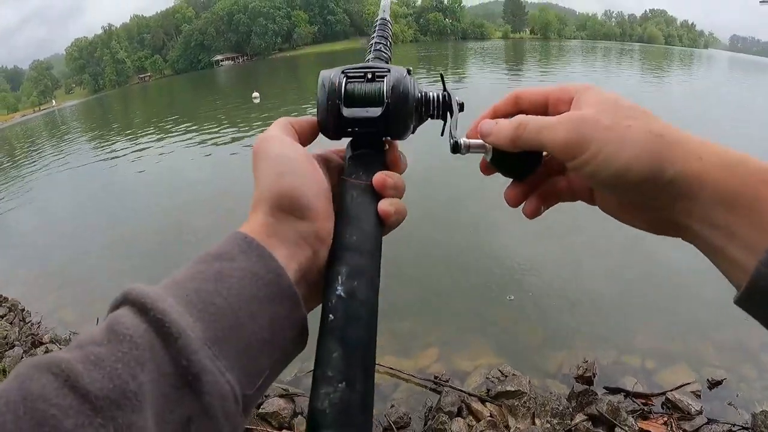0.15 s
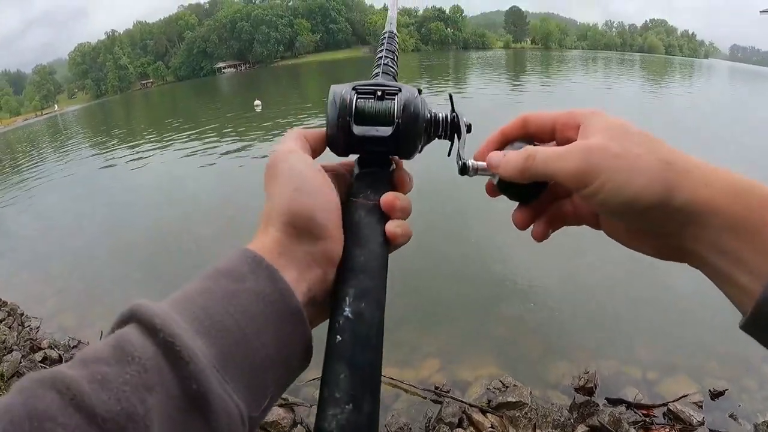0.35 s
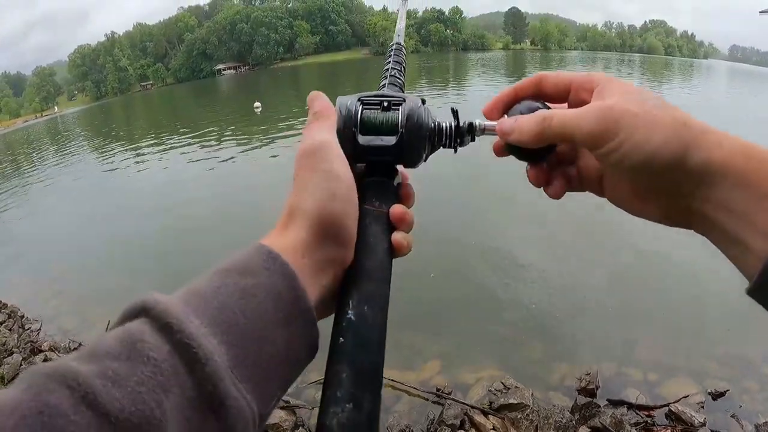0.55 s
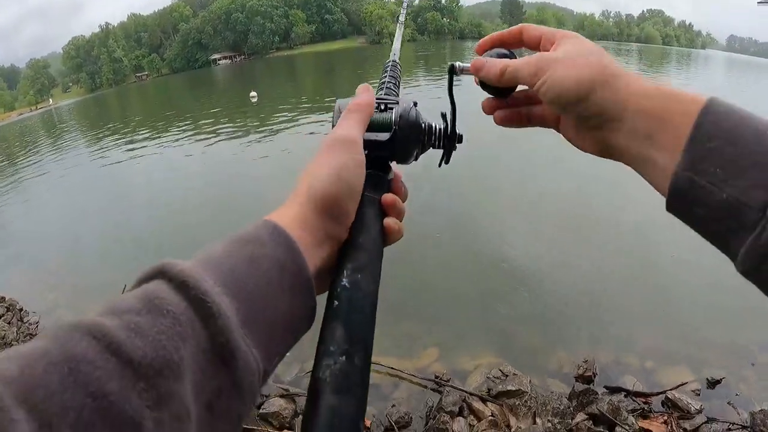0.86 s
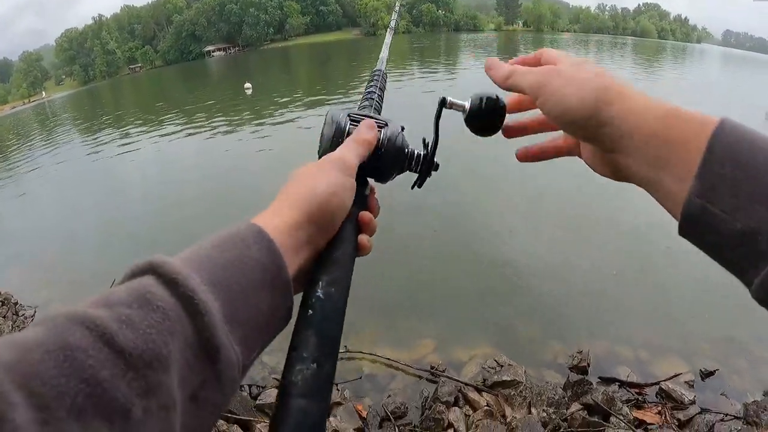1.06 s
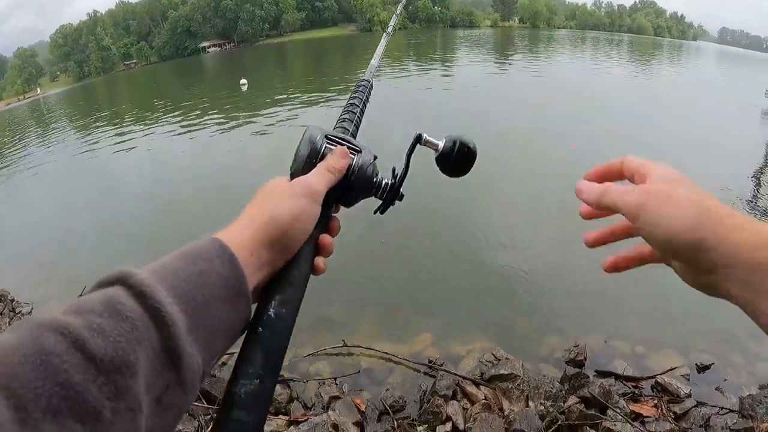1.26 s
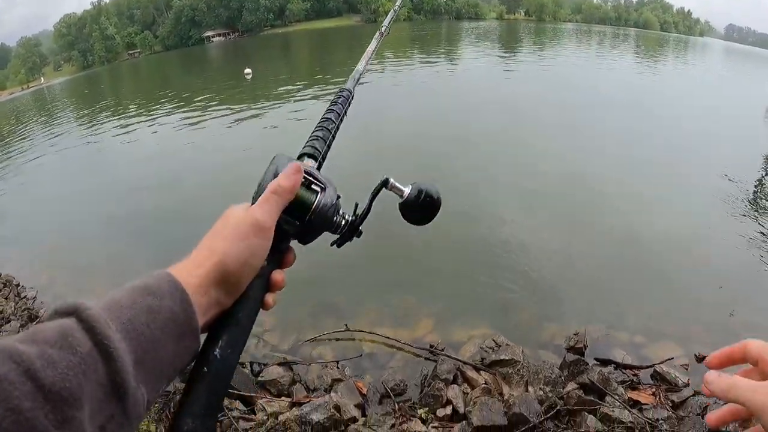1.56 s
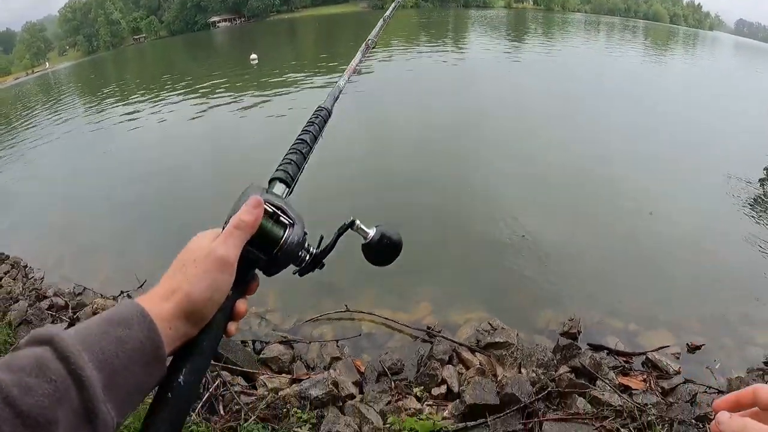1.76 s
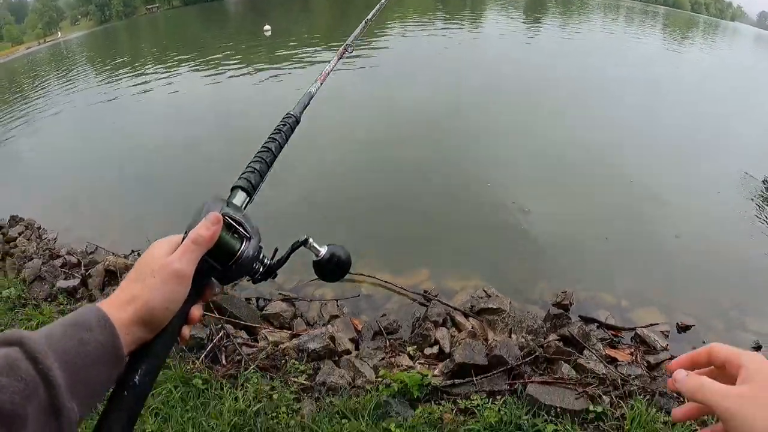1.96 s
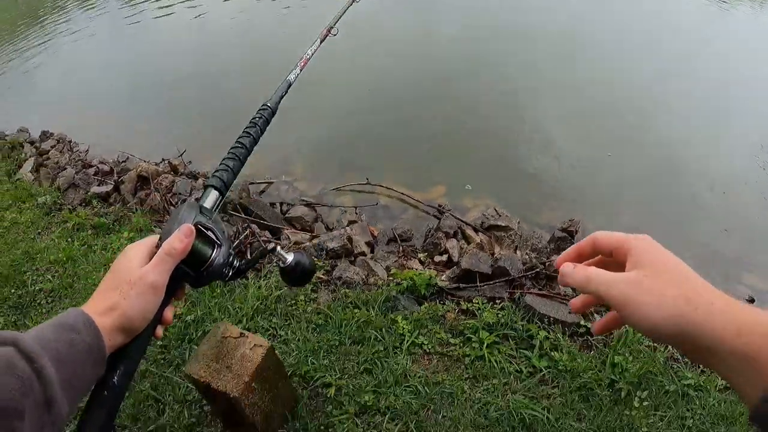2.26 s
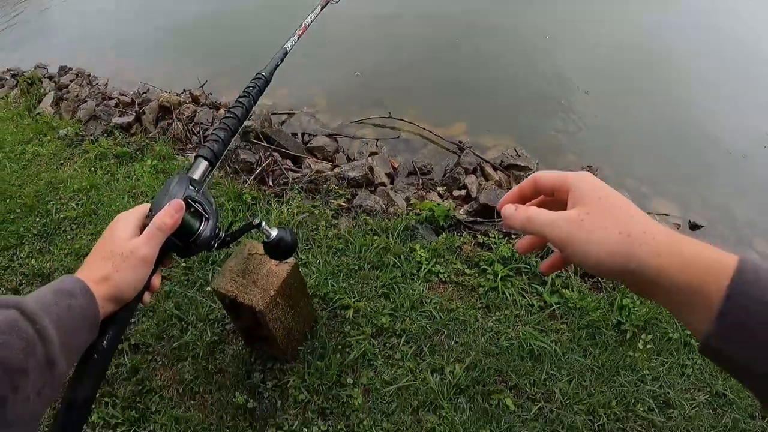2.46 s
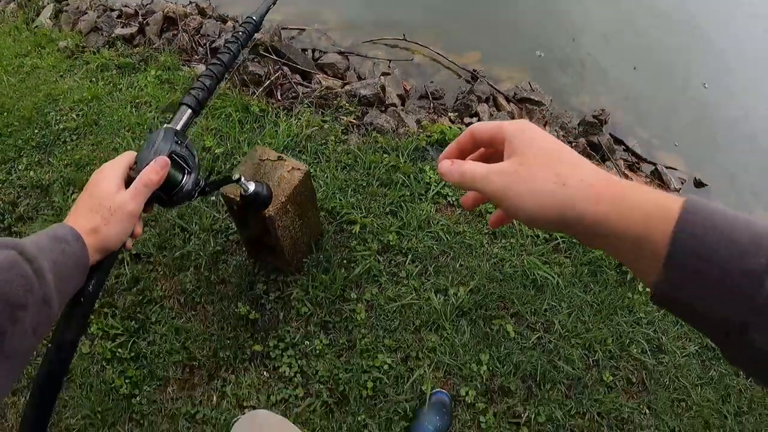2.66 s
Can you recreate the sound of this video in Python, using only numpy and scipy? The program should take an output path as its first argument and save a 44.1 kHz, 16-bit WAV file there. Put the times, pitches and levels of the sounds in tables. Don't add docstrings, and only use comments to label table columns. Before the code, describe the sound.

Fishing reel clicker snaps by hand, knocks, then ratchets into a fast run beside a rumbling shore

```python
import sys
import numpy as np
from scipy import signal
from scipy.fft import rfft, irfft, next_fast_len
from scipy.io import wavfile
from scipy.ndimage import uniform_filter1d

SR = 44100
rng = np.random.default_rng(int(sys.argv[2]) if len(sys.argv) > 2 else 0)


def pcm_store(signal):
    levels = np.round(np.clip(np.atleast_2d(signal), -1, 1) * 32767)
    wavfile.write(sys.argv[1], SR, levels.astype(np.int16).T)


def makeup_ratio(level_db):
    decades = np.asarray(level_db, float) / 20
    return 10 ** decades


N = 123479

# frequency in Hz, level in dB per Hz.
SHORE_SPECTRUM = [(15, -26), (45, -0.5), (100, 2), (165, -6.5), (330, -17), (1400, -28), (2900, -37),
                  (7000, -40.5), (12500, -57)]
# frequency in Hz, level in dB.
SHORE_SIDE = [(60, -26.5), (200, -13), (500, -7), (1500, -2.5), (8000, -7.5)]
# time in seconds, level in dB.
SHORE_FADE = [
    (0, 1.5),
    (.15, 1.5),
    (1.4, 2.5),
    (2.2, 0),
    (2.8, 2),
]
SHORE_DB, SHORE_TOP_HZ = -46, 12800
SWELL_DB, FLICKER_DB = .6, 1.5

# frequency in Hz, width in Hz, level in dB.
DRONE_LINES = [
    (61.9, 8.5, -57.5),
    (140.96, 8.2, -55),
]

# start in seconds, level in dB, centre in Hz, length in seconds.
FINGER_TICKS = [(0.02, -56, 9000, 0.0037), (0.162, -69, 5000, .006), (0.203, -64, 5700, .005),
                (.2194, -55, 6100, 0.007), (0.2595, -49, 3100, 0.0095), (0.402, -62, 7000, .006),
                (0.4756, -44.5, 5730, 0.0028), (0.478, -64, 6100, 0.04), (1.093, -44, 5000, .004),
                (1.135, -48.5, 5360, 0.0032), (1.174, -54, 4140, 0.0049), (1.228, -37, 3500, 0.0062),
                (1.439, -45, 3000, 0.005), (1.461, -38, 3000, 0.01), (.27, -48, 1470, 0.089)]

# time in seconds, level in dB.
WOUND_SNAPS = [(0.3336, -18), (0.6016, -17.5), (0.6229, -18), (0.6399, -17), (0.658, -16.5),
               (0.6764, -15.5), (0.6965, -15.5), (0.7158, -16.5), (0.7341, -16), (0.7515, -16),
               (0.768, -16), (0.784, -15), (0.8004, -16), (0.818, -16), (0.8361, -16.5), (0.8543, -17),
               (0.8722, -16), (0.8878, -17.5), (0.9027, -15), (0.9196, -15.5), (0.9368, -16),
               (0.9553, -15.5), (0.9793, -15.5), (1.0152, -16)]
# time in seconds, level in
# dB.
DRAGGED_SNAPS = [(1.4858, -16), (1.537, -17.5), (1.565, -17), (1.5885, -17), (1.6122, -19.5), (1.6352, -18),
                 (1.6606, -18), (1.6885, -17), (1.714, -16.5), (1.7356, -17), (1.7538, -16), (1.774, -17),
                 (1.801, -18), (1.836, -17), (1.8639, -17), (1.8888, -17), (1.913, -17), (1.9384, -19),
                 (1.965, -19.5), (1.9891, -18.5), (2.01, -16.5), (2.0275, -16.5), (2.0438, -16.5),
                 (2.0591, -17.5), (2.0745, -16.5), (2.0904, -17), (2.1055, -16.5), (2.1193, -19), (2.1321, -17),
             (2.1443, -19), (2.1554, -20), (2.1663, -20.0), (2.1771, -19.5), (2.1869, -17.5), (2.1977, -18),
             (2.208, -18.5), (2.2176, -19), (2.2287, -17.5), (2.2394, -16.5), (2.2499, -18.5),
             (2.2609, -19.5), (2.2715, -19.0), (2.2818, -19), (2.2926, -20.5), (2.3028, -20.5),
             (2.313, -20.0), (2.3234, -18), (2.3341, -19.0), (2.3446, -17), (2.3552, -20), (2.3671, -17),
             (2.379, -17.5), (2.3915, -17.5), (2.4046, -19.0), (2.4177, -18.0), (2.4311, -20.5),
             (2.4439, -20.0), (2.4568, -20), (2.4705, -21), (2.4829, -18.5), (2.4964, -19.5), (2.5112, -17),
             (2.5274, -19), (2.5446, -17), (2.5629, -18), (2.5803, -19), (2.5979, -18.0), (2.616, -20.5),
             (2.6352, -20.5), (2.6548, -22), (2.675, -22), (2.6959, -20.5), (2.7182, -20), (2.7416, -19.5),
             (2.7651, -18.5), (2.787, -19.5)]
SNAP_DB = 0.5
DRAG_START_S = 1.4
WHEEL_TEETH, LOW_TOOTH = 13, 1
# delay in seconds, level in dB.
REBOUNDS = [
    (.00089, -5.5),
    (.0018, -15),
    (.0035, -20.5),
]
REBOUND_SPREAD, SNAP_COLOUR_DB = .06, .8

# frequency in Hz, time to fall 60 dB in seconds, level of the longer ring in dB.
ROD_MODE = (515.5, 0.1, -65)
# frequency in Hz, time to fall 60 dB in seconds, level of the longer ring in dB.
BODY_MODES = [(1059.6, 0.0072, -7), (1405, 0.0089, -5), (1690, 0.024, -7), (2440, 0.0053, -22.5),
              (3000, 0.0089, -10.5), (3500, 0.0032, -7), (3832, 0.0035, -2.5), (4655, 0.0031, -8),
              (5190, 0.0039, -3), (5760, 0.0062, -16.5), (7775, 0.0065, -17), (8940, 0.0073, -15),
              (12000, 0.0043, -16), (14600, 0.0046, -26)]
TWIN_DETUNE, RING_LONGER, BODY_LOW_HZ = 1, 3.36, 850
# time in seconds, for upright, tilted, turning, lowered, low.
POSE_S = [.62, .95, 1.55, 2.1, 2.75]
# level in dB upright, tilted, turning, lowered, low.
POSE_DB = [(-25, -24.5, -29, -29.5, -30.5), (-10.5, -11.0, -18.5, -24.5, -34), (-24, -13, -11, -33, -50),
           (-14, -9.5, -19, -22.5, -16), (-19, -35, -9.0, -11, -2), (-16, -14, -6, -8.5, -4),
           (-3, -1, -2, -27, -32), (-3, 1, -10, -7, -3.5), (4, 1.5, 3.0, 4, 2), (-2, -10.5, -9.5, -1, -4),
           (-0.5, -3, -8.5, -1.5, 6.5), (-3, -12, -1.5, -4.5, -4), (-3.5, -6, -4.5, -5.5, -3.0),
           (-8, -8.5, -7, -15, -8), (-26, -21.0, -26, -20, -19)]
# time in seconds, for upright, turning, low.
PAN_S = [1.0, 1.8, 2.7]
# difference in dB upright, turning, low.
PAN_DB = [(3, 5, 6.8), (-5, -4, 0.5), (6, 2.5, 2.0), (-5.5, -10, 0.89), (1, 3, 1.3), (0, 2.5, 0.79),
          (1, 0, 2.7), (2, 8, 4.4), (1.0, 4.0, 4.1), (1, -4.5, 2.2), (-1.5, 1.0, 3.3), (1.5, 3, 1.9),
          (-1, 4, 5.1), (-2.5, -0.5, 1.9), (-6, -6, 1.5)]
# cosine part in dB, sine part in dB.
TURN_DB = [(0, 3), (-3.5, -0.5), (-1, 1), (-3, -2.5), (4.5, -2), (3.5, -3), (-6.5, 2), (5.5, 0), (0.5, -1),
           (3, -2.0), (3, 0.5), (0.5, 0.5), (0.5, 2.5), (0, 1.5), (0.5, 4)]
LEFT_LATE_S, EAR_LAG_S = .00002, .000015

RATTLE_DB, RATTLE_T60_S, RATTLE_HZ = -8.5, 0.036, 2600
AIR_DB, AIR_T60_S, AIR_HZ, AIR_OCTAVES = -19.5, 0.06, 1800, 2.42
RATTLE_WIDTH, TAIL_TOP_HZ = .3, 7500

# level in dB, length of contact in seconds, length of rattle in seconds.
CLUTCH_SCRAPE = (-28, .00006, .0022)
CLUTCH_KNOCK = (-21.5, .00009, .00012)
HANDLE_KNOCK = (-22, 0.00012, 0.001187)
SCRAPE_S, CLUTCH_S, HANDLE_S = 1.2348, 1.24, 1.3477
# frequency in Hz, level in dB, time to fall 60 dB in seconds.
SCRAPE_MODES = [(3500, 1, 0.0021), (6340, 5, 0.0041), (11200, 7, 0.0022)]
# frequency in Hz, level in dB, time to fall 60 dB in seconds.
CLUTCH_MODES = [(520, -25, 0.07), (680, -30, 0.05), (1610, -13, 0.01), (2270, -8, 0.016), (3420, 6, 0.005),
                (4930, 0, 0.004), (5730, -9, 0.014), (7640, 7, 0.004), (11700, 7, .003), (14300, -4, .003)]
# frequency in Hz, level in dB, time to fall 60 dB in seconds.
HANDLE_MODES = [(312, -8.5, 0.019), (593, -3, 0.03), (903, -2.5, 0.021), (1400, -2.5, 0.014),
                (1860, -27, 0.011), (3120, -3.5, 0.0065), (4650, -8, 0.0083), (7000, 4, 0.003),
                (12200, 4, .004)]


def ring(x, hz, t60):
    radius = np.exp(-np.log(1000) / (t60 * SR))
    w = 2 * np.pi * min(hz, .45 * SR) / SR
    return signal.lfilter([0, np.sin(w)], [1, -2 * radius * np.cos(w), radius * radius], x)


def band(x, hz, octaves):
    edges = [hz * 2 ** (-octaves / 2), min(hz * 2 ** (octaves / 2), .48 * SR)]
    return signal.sosfilt(signal.butter(2, edges, "band", fs=SR, output="sos"), x)


def dull(x, hz):
    return signal.sosfilt(signal.butter(6, hz, fs=SR, output="sos"), x)


def spikes(times, sizes):
    at = np.asarray(times) * SR
    taps = np.floor(at)[:, None] + np.arange(-7, 9)
    distance = taps - at[:, None]
    shape = np.sinc(distance) * np.cos(np.pi * distance / 16) ** 2
    places = taps.clip(0, N - 1).astype(int)
    return np.bincount(places.ravel(), (shape * np.asarray(sizes)[:, None]).ravel(), N)


def fading(times, sizes, t60):
    decay = np.exp(-np.log(1000) / (t60 * SR))
    return signal.lfilter([1], [1, -decay], abs(spikes(times, sizes)))


def walk(rate):
    hold = int(SR / rate)
    steps = np.repeat(rng.standard_normal(N // hold + 1), hold)
    return 1.3 * uniform_filter1d(uniform_filter1d(steps, hold), hold)[:N]


def wide_noise(width):
    return rng.standard_normal(N) + width * rng.standard_normal((2, N))


def shore():
    swell = walk(1.24)
    f = np.fft.rfftfreq(next_fast_len(N + 1, True), 1 / SR) + 1

    def colour(table):
        hz, db = np.array(table).T
        return makeup_ratio(np.interp(np.log(f), np.log(hz), db))

    mid, side = rfft(rng.standard_normal((2, 2 * len(f) - 2))) * colour(SHORE_SPECTRUM)
    pair = mid + side * colour(SHORE_SIDE) * np.array([[1], [-1]])
    out = 0
    for octave in np.arange(3.5, 15, .5):
        share = np.cos(np.pi * np.clip(np.log2(f) - octave, -.5, .5)) ** 2
        out = out + irfft(pair * share)[:, :N] * makeup_ratio(FLICKER_DB * walk(8.93))
    fade = np.interp(np.arange(N) / SR, *np.array(SHORE_FADE).T)
    out = out * makeup_ratio(SWELL_DB * swell + fade)
    return dull(out, SHORE_TOP_HZ) * makeup_ratio(SHORE_DB) / np.std(out)


def drone():
    out = 0
    for hz, width, db in DRONE_LINES:
        line = band(rng.standard_normal(N), hz, width / hz * 1.4)
        out = out + makeup_ratio(db) * line * np.sqrt(SR / width / 2)
    return out


def fingers():
    noise = wide_noise(0.58)
    out = 0
    for s, db, hz, length in FINGER_TICKS:
        puff = fading([s], [makeup_ratio(db)], 4 * length) * noise
        out = out + band(band(puff, hz, 1.4), hz, 1.4)
    return out


def clicker():
    t, db = np.array(WOUND_SNAPS + DRAGGED_SNAPS).T
    db = db + SNAP_DB
    modes = [ROD_MODE] + BODY_MODES
    angle = 2 * np.pi * (np.arange(len(t)) - LOW_TOOTH) / WHEEL_TEETH
    turn = np.array([np.cos(angle), np.sin(angle)])
    chance = rng.standard_normal((len(t), len(modes), 2))
    lag = rng.standard_normal(len(modes))

    delay, rebound_db = np.array([(0, 0.089)] + REBOUNDS).T
    stretch = np.exp(REBOUND_SPREAD * (turn[1] + chance[:, 0, 0] / 2))
    hits = t[:, None] + delay * stretch[:, None]

    rod, body = np.zeros((2, 2, N))
    for k, (hz, t60, ring_db) in enumerate(modes):
        turn_db = (t > DRAG_START_S) * (np.array(TURN_DB[k]) @ turn)
        mode_db = db + np.interp(t, POSE_S, POSE_DB[k]) + turn_db
        pan_db = np.interp(t, PAN_S, PAN_DB[k])
        for c, side in enumerate((.5, -.5)):
            size = makeup_ratio((mode_db + side * pan_db)[:, None] + rebound_db)
            times = hits.ravel() + side * (EAR_LAG_S * lag[k] + LEFT_LATE_S)
            low_hit, high_hit = [spikes(times, (size * makeup_ratio(SNAP_COLOUR_DB * chance[:, k, [j]])).ravel())
                                 for j in range(2)]
            short = ring(low_hit, hz - TWIN_DETUNE / t60, t60) + ring(high_hit, hz + TWIN_DETUNE / t60, t60)
            longer = makeup_ratio(ring_db) * ring(high_hit, hz, RING_LONGER * t60)
            target = body if k else rod
            target[c] += (-1) ** k * (short / 2 + longer)

    noise = wide_noise(RATTLE_WIDTH)
    rattle = fading(t, makeup_ratio(db + RATTLE_DB - 2.5), RATTLE_T60_S) * noise
    body += dull(band(rattle, RATTLE_HZ, 2.57), TAIL_TOP_HZ)
    body = signal.sosfilt(signal.butter(4, BODY_LOW_HZ, "high", fs=SR, output="sos"), body)
    air = fading(t, makeup_ratio(db + AIR_DB), AIR_T60_S) * noise[::-1, ::-1]
    air = dull(band(air, AIR_HZ, AIR_OCTAVES), TAIL_TOP_HZ)
    return body + band(rod, ROD_MODE[0], 1.0) + air


def knock(s, event, modes, pan_db):
    db, contact, rattle = event
    chance = rng.random((8, 2)) * (np.arange(8) > 0)[:, None]
    blows = spikes(s + 2 * rattle * chance[:, 0], makeup_ratio(db - 8 * chance[:, 1]))
    push = np.hanning(int(contact * SR) + 3)
    blows = np.convolve(blows, push / push.sum())[:N]
    body = sum((-1) ** k * makeup_ratio(g) * ring(blows, hz, t60) for k, (hz, g, t60) in enumerate(modes))
    tail = fading([s], [makeup_ratio(db - 1.5)], 0.026) * wide_noise(RATTLE_WIDTH)
    tail = dull(band(tail, 2100, 2.9), TAIL_TOP_HZ)
    return (body + tail) * makeup_ratio(np.array([[pan_db], [-pan_db]]) / 2)


def clutch():
    scrape = knock(SCRAPE_S, CLUTCH_SCRAPE, SCRAPE_MODES, .3)
    return scrape + knock(CLUTCH_S, CLUTCH_KNOCK, CLUTCH_MODES, 1.0)


def handle():
    return knock(HANDLE_S, HANDLE_KNOCK, HANDLE_MODES, -3.0)


def scene():
    return shore() + drone() + fingers() + clicker() + clutch() + handle()


def band_limit(x):
    return signal.sosfilt(signal.butter(12, 16550, fs=SR, output="sos"), x)


def record(dry):
    mix = dull(dry, 14800)
    return band_limit(mix)


dry = scene()
out = record(dry)
pcm_store(out)
```